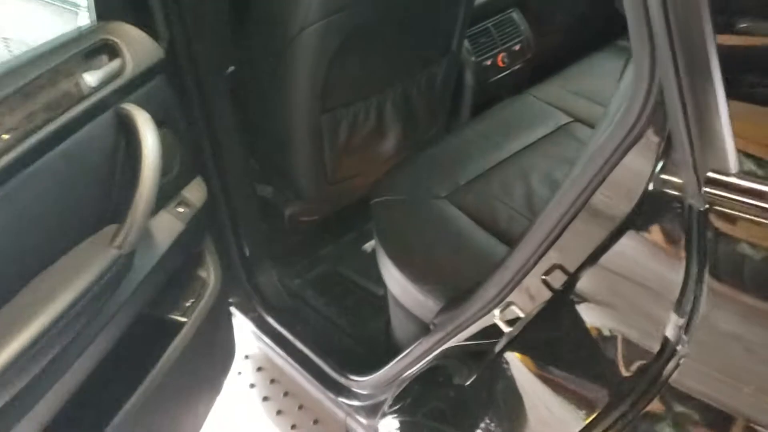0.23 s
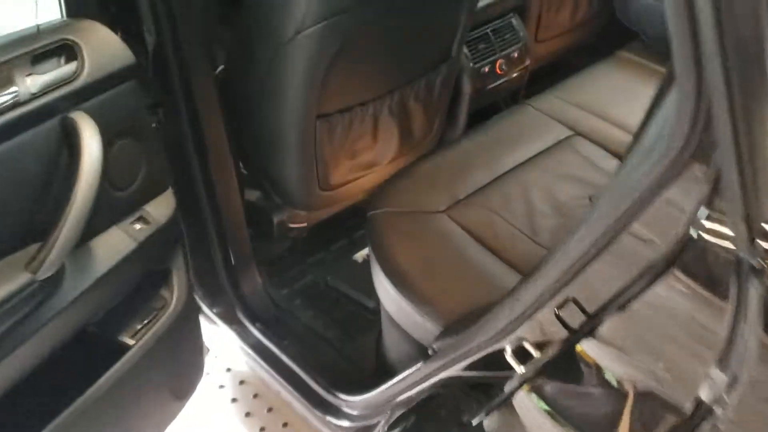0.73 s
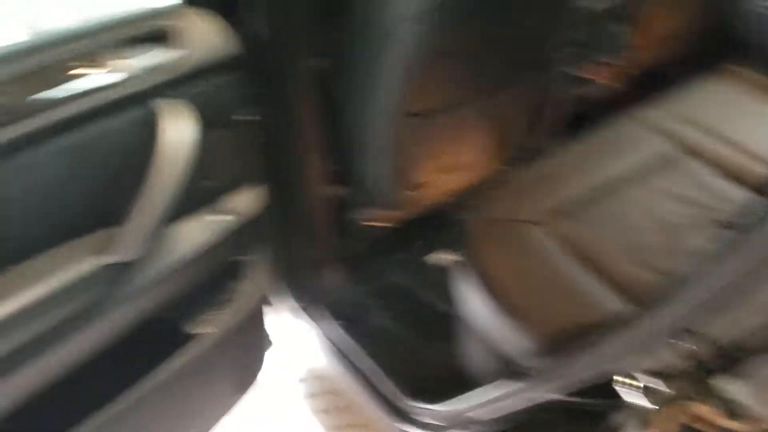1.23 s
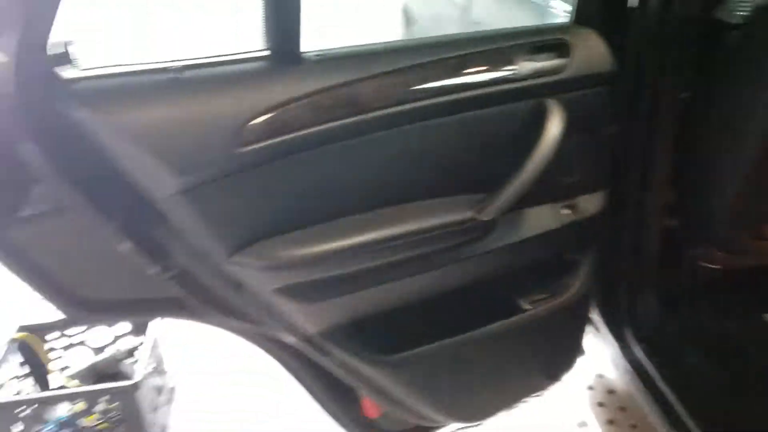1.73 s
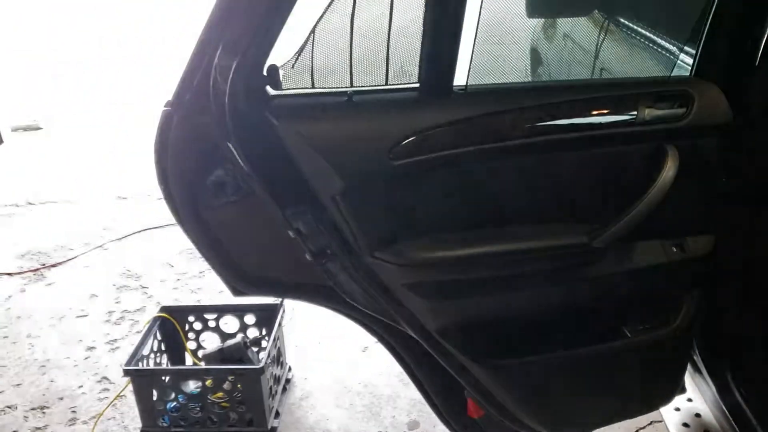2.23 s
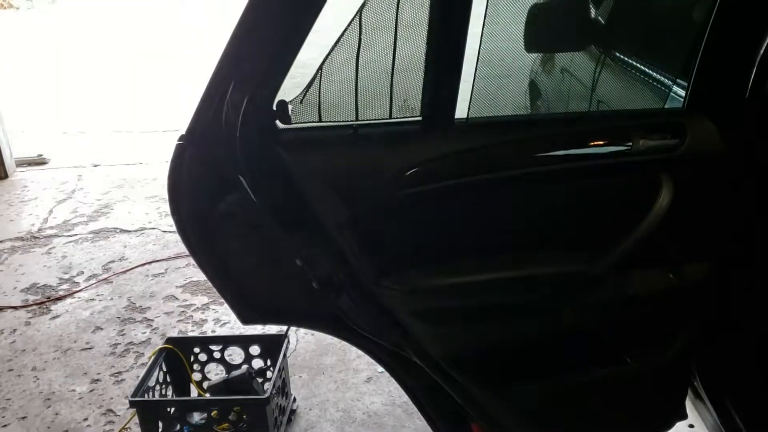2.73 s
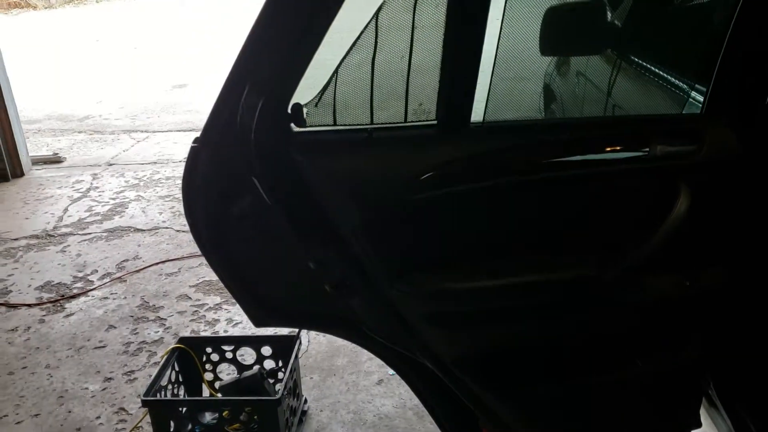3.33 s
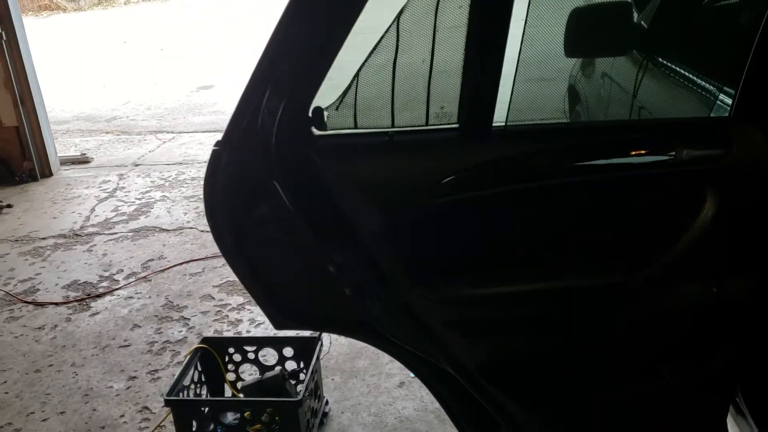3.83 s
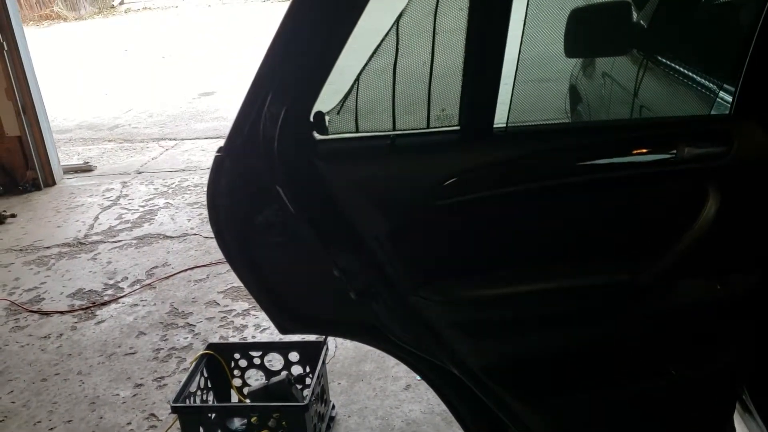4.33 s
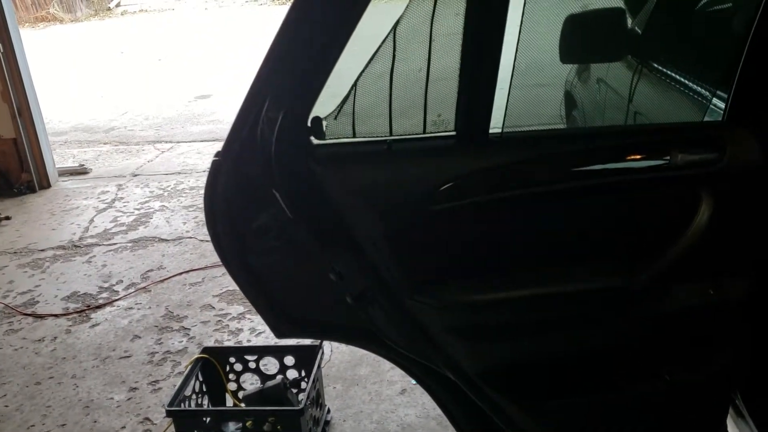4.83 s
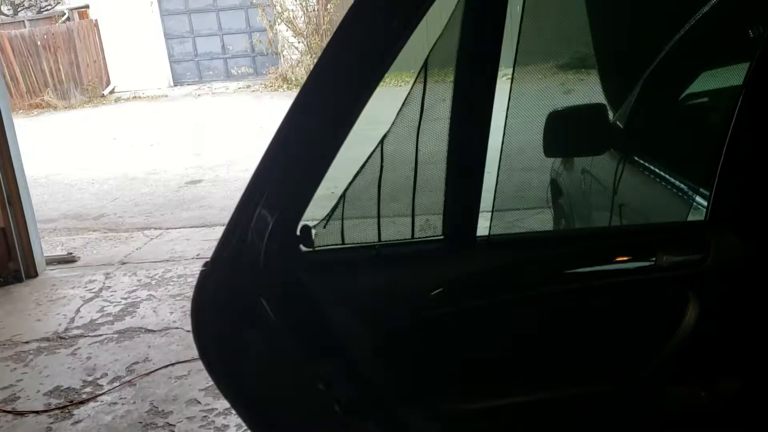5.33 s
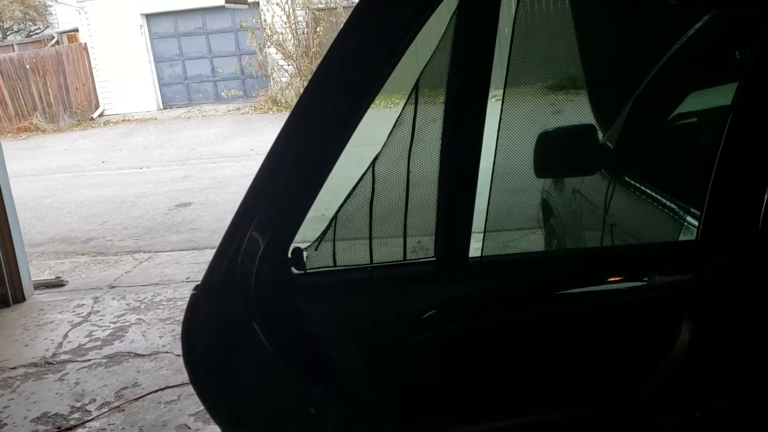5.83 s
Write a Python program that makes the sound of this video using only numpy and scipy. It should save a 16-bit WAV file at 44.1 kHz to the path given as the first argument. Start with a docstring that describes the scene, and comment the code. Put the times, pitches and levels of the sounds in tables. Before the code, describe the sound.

Close beside an open rear car door in a garage, a large engine idles unevenly with a misfire, booming about five lumpy chugs a second with soft gas puffs. A small metallic click and rattle, thin squeak and soft trim knock come at the start. Around two seconds a jacket swishes as the handheld microphone turns to the garage door, and the engine bay whirr opens up.

```python
"""A garage, beside the open rear door of a car whose V8 idles with a misfire.
Unequal firings kick the booms of exhaust and room, five chugs a second, each followed by a puff of gas noise.
Resonant noise makes the whirr of the engine bay, short struck modes its ticking; hiss and thin whines lie behind.
Decaying noise clicks and rattles at first, with a knock and a squeak; grainy noise is the swish of a jacket
as the person holding the microphone turns toward the open garage door."""
import sys
import numpy as np
from scipy import signal
from scipy.fft import rfft, irfft
from scipy.io import wavfile
from scipy.ndimage import uniform_filter1d

SR = 44100
rng = np.random.default_rng(int(sys.argv[2]) if len(sys.argv) > 2 else 0)


def log_audio(samples):
    """Write samples as a 16-bit WAV file to the path given in sys.argv[1]."""
    # one column per channel
    frames = np.atleast_2d(samples).T
    # limit to full scale, then quantise
    limited = np.clip(frames, -1, 1)
    pcm = np.round(limited * 32767).astype(np.int16)
    wavfile.write(sys.argv[1], SR, pcm)


N = 268304
TIME, FREQ = np.arange(N) / SR, np.fft.rfftfreq(N, 1 / SR)
TURNED = np.interp(TIME, [1.3, 2.1], [0, 1])  # 0 facing the cabin, 1 facing the garage door


def from_db(db):
    """Decibels to gain."""
    return 10 ** (np.asarray(db) / 20)


def spectrum(rows, axis=1):
    """One column of a table over frequency, joined on a log axis."""
    table = np.transpose(rows)
    return np.interp(np.log(FREQ + 1), np.log(table[0]), table[axis])


def curve(rows, axis=1):
    """One column of a table over time, joined by straight lines."""
    table = np.transpose(rows)
    return np.interp(TIME, table[0], table[axis])


def drift(rate_hz):
    """Random wander of unit size: noise with little left above the given rate."""
    wander = irfft(rfft(rng.standard_normal(N)) * np.exp(-(FREQ / rate_hz) ** 2), N)
    return wander / wander.std()


# likeness of left and right in diffuse sound: (frequency [Hz], correlation [0-1])
LEFT_RIGHT_LIKENESS = [(125, 0.9), (250, 0.86), (500, 0.74), (900, 0.17), (2000, 0)]


def noise(density_db):
    """Two-channel room noise of a given density [dB/Hz], alike mainly in the bass."""
    left, other = rfft(rng.standard_normal((2, N)))
    alike = np.clip(spectrum(LEFT_RIGHT_LIKENESS), 0, 1)
    right = alike * left + np.sqrt(1 - alike ** 2) * other
    return irfft(np.array([left, right]) * from_db(density_db), N) * np.sqrt(SR / 2)


def ripple(depth_db, spacing_hz):
    """Reflections comb a spectrum into fixed narrow peaks and dips, different at each port."""
    size = max(2, int(spacing_hz * N / SR))
    comb = rng.standard_normal((2, len(FREQ)))
    for _ in range(2):
        comb = uniform_filter1d(comb, size, axis=1)
    # full depth only above 1200 Hz
    return depth_db * comb / comb.std() * np.clip(FREQ / 1200, 0, 1)


def impulses(times, sizes):
    """A train of impulses that begins one second early, so that rings are already under way."""
    at = np.clip(np.round((np.asarray(times) + 1) * SR).astype(int), 0, N + SR)
    return np.bincount(at, sizes, N + SR + 1)[:-1]


def strike(times, sizes, modes):
    """Blows that ring a set of dying modes."""
    t = np.arange(SR // 3) / SR
    ring = 0
    for hz, db, t60 in modes:
        decay = np.exp(-np.log(1000) * t / t60)
        ring = ring + from_db(db) * decay * np.sin(2 * np.pi * hz * t)
    return signal.oaconvolve(impulses(times, sizes), ring)[SR:SR + N]


def garage(x, wet_db, t60):
    """Direct sound and a diffuse, exponentially dying tail for each port."""
    t = np.arange(SR // 2) / SR
    tail = rng.standard_normal((2, len(t))) * np.exp(-np.log(1000) * t / t60)
    tail /= np.linalg.norm(tail, axis=1, keepdims=True)
    return x + from_db(wet_db) * signal.oaconvolve(x[None], tail, axes=1)[:, :N]


# balance as the microphone turns, also played by the engine layers below:
# (time [s], gas gain [dB], engine bay gain [dB], hiss gain [dB], exhaust gain [dB])
FACING_GAINS = [(0, 3.5, -1.5, 1.5, -2.5), (.4, 2, -2, -2, -1.5), (1.1, 4.5, -3, -1.5, -4),
                (1.7, 2, 0.5, 0, -0.9), (3, 2.1, 0.24, 0.1, -0.5), (6.08, 0.4, 0.5, -0.4, 0.46)]
# high hiss before its gains: (frequency [Hz], density [dB/Hz])
HISS_SPECTRUM = [(1500, -115), (4500, -100), (7000, -97), (10000, -94.5), (16000, -100)]


def hiss(starts, dip_db=2.0, trough=0.85, crank_db=0.3, flicker_db=1.0):
    """A high hiss that sags once in every chug and throbs with each crank turn."""
    chug_position = np.interp(TIME, starts, np.arange(len(starts)))
    angle = 2 * np.pi * (chug_position - trough)
    sag_db = dip_db * (np.cos(angle / 2) ** 4 - 3 / 8)  # 3/8 is the mean of cos^4
    throb_db = crank_db * np.cos(2 * angle)
    air = noise(spectrum(HISS_SPECTRUM) + ripple(depth_db=2.0, spacing_hz=40))
    return air * from_db(curve(FACING_GAINS, axis=3) - sag_db - throb_db + flicker_db * drift(30))


# faint whines before their waver:
# (frequency [Hz], level facing the cabin [dB], level facing the door [dB], wander [Hz])
WHINE_LINES = [(482, -60, -70, 1.5), (890, -69, -69, 2), (2639, -78, -76, 4), (4000, -77, -76, .5),
               (6000, -82, -82, .5)]


def whines(waver_db=2):
    """Thin wandering sines from pump and electrics, changing as the microphone leaves the cabin."""
    total = 0
    for hz, cabin_db, door_db, wander in WHINE_LINES:
        level_db = cabin_db + TURNED * (door_db - cabin_db) + waver_db * drift(7.8)
        phase = 2 * np.pi * np.cumsum(hz + wander * drift(6.6)) / SR
        total = total + np.sqrt(2) * from_db(level_db) * np.sin(phase)  # root 2: levels are RMS
    return total


# click of a small metal part, then its rattles: (time [s], gain [dB], t60 [s])
CLICK_AND_RATTLES = [(0.08, 9, 0.021), (0.084, 0, 0.54), (0.102, -6.5, 0.32)]
# crowded ring of that part, before the gains above: (frequency [Hz], density [dB/Hz])
CLICK_RING = [(1500, -105), (2700, -83), (3200, -78.5), (4400, -84), (5600, -76.5), (6500, -100),
              (12000, -102)]
# soft knock on the trim: (time [s], level [dB])
TRIM_KNOCKS = [(.335, -40)]
# modes of the knocked trim: (frequency [Hz], gain [dB], t60 [s])
TRIM_RING = [(840, -2, 0.044), (990, -5, .04), (2300, -10, .03)]
# thin squeak, its pitch before a random wander: (time [s], frequency [Hz], level [dB])
SQUEAK_GLIDE = [(0, 13560, -53), (.07, 13550, -50), (.11, 13900, -75), (.15, 13000, -84)]


def handling():
    """Noise dying in steps makes a rattling click; struck modes knock and a gliding sine squeaks."""
    decay = 0
    for start_s, db, t60 in CLICK_AND_RATTLES:
        decay = decay + (TIME >= start_s) * from_db(db - 60 * abs(TIME - start_s) / t60)
    rattle = noise(spectrum(CLICK_RING) + ripple(depth_db=4.0, spacing_hz=80)) * decay
    knock_s, knock_db = np.transpose(TRIM_KNOCKS)
    knock = strike(knock_s, from_db(knock_db), TRIM_RING)
    squeak_hz = curve(SQUEAK_GLIDE) + 35 * drift(150)
    squeak = np.sin(2 * np.pi * np.cumsum(squeak_hz) / SR) * from_db(curve(SQUEAK_GLIDE, axis=2))
    squeak = squeak * (TIME < SQUEAK_GLIDE[-1][0])
    return rattle + garage(knock + squeak, wet_db=-2, t60=.25)


# strokes of the jacket: (time of peak [s], rise [s], fall [s], swish gain [dB], airy brushing gain [dB])
JACKET_STROKES = [(0.0, .05, 0.11, -8, -4), (1.06, 0.21, 0.18, -16, -12), (1.12, .38, .58, -22, -2),
                  (1.95, .19, 0.24, 0, -6), (2.19, 0.17, 0.095, -5, -20)]
# full swish of the cloth, before the stroke gains: (frequency [Hz], density [dB/Hz])
SWISH_SPECTRUM = [(150, -100), (500, -89), (1000, -70), (1300, -75), (1900, -75), (2600, -73),
                  (3400, -77.5), (4500, -74), (7000, -87), (10000, -89), (16000, -90)]
# airy hiss of a light touch, before the stroke gains: (frequency [Hz], density [dB/Hz])
AIRY_SPECTRUM = [(3000, -115), (9000, -100), (12200, -90.5), (13500, -93), (16000, -89)]


def jacket(grain_db=-0.4, catch_db=0.65, roundness=0.93):
    """Cloth slides over cloth in a fine grain, catching at folds; a light touch gives only an airy hiss."""
    swish, airy = 0, 0
    for peak_s, rise, fall, swish_db, airy_db in JACKET_STROKES:
        speed = np.interp(TIME, [peak_s - rise, peak_s, peak_s + fall], [0, 1, 0]) ** roundness
        # overlapping strokes add as powers
        swish = np.hypot(swish, speed * from_db(swish_db))
        airy = np.hypot(airy, speed * from_db(airy_db))
    grain = from_db(grain_db * drift(300) + catch_db * drift(46))
    cloth = noise(spectrum(SWISH_SPECTRUM) + ripple(depth_db=2.5, spacing_hz=70))
    return cloth * swish * grain + noise(spectrum(AIRY_SPECTRUM)) * airy


# whirr of fan and belts, before its gains: (frequency [Hz], density [dB/Hz])
WHIRR_SPECTRUM = [(100, -133), (350, -76.5), (620, -77.5), (860, -78.5), (1000, -81), (1300, -84.5),
                  (1700, -83), (2400, -85.5), (3300, -89.5), (5000, -92), (8000, -102), (16000, -112)]
# resonances of the bay, at full height once turned: (frequency [Hz], width [Hz], height above the whirr [dB])
BAY_RESONANCES = [(340, 21, 6), (560, 71, 2.5), (758, 66, 7.5), (841, 11, 9.5), (1700, 52, 2.5),
                  (2670, 740, 0.5)]
# engine cover and valve gear, before the tick level: (frequency [Hz], gain [dB], t60 [s])
VALVE_RING = [(1135, 13.5, 0.0077), (1750, 1, 0.0073), (2640, -0.5, 0.0057), (3550, -7, 0.0027),
              (5800, 0, .006)]


def engine_bay(times, flutter_db=0.71, tick_db=-60, tick_spread_db=2.0, shielded=0.44):
    """Fan and belts whirr in the bay's resonances; valves tick twice for every firing."""
    peaks_db = 0
    for hz, width, db in BAY_RESONANCES:
        peaks_db = peaks_db + db / (1 + (2 * (FREQ - hz) / width) ** 2)
    body_db = spectrum(WHIRR_SPECTRUM) + ripple(depth_db=2.0, spacing_hz=24.8)
    # the car body hides much of the resonances until the microphone leaves the cabin
    open_whirr = np.sqrt(TURNED) * noise(body_db + peaks_db)
    shielded_whirr = np.sqrt(1 - TURNED) * noise(body_db + shielded * peaks_db)
    whirr = (open_whirr + shielded_whirr) * from_db(flutter_db * drift(48))
    # one tick with each firing, one midway to the next
    closings = np.concatenate([times, (times[1:] + times[:-1]) / 2])
    closing_db = tick_db + tick_spread_db * rng.standard_normal(len(closings))
    ticks = strike(closings, from_db(closing_db), VALVE_RING)
    return (whirr + garage(ticks, wet_db=-3, t60=0.16)) * from_db(curve(FACING_GAINS, axis=2))


# exhaust gas, before the facing gain: (frequency [Hz], density [dB/Hz])
GAS_SPECTRUM = [(15, -85), (30, -76), (52, -60.5), (90, -65), (155, -63), (185, -71.5), (235, -69.5),
                (270, -73), (320, -68.5), (420, -83), (900, -94), (3000, -120)]


def gas(times, sizes, delay=.026, puff_s=0.015):
    """A puff of turbulent gas leaves the tailpipe after each firing, over a weak steady flow."""
    t = np.arange(SR // 5) / SR
    puff = t / puff_s * np.exp(-t / puff_s)
    puffs = signal.oaconvolve(impulses(times + delay, sizes ** 2), puff)[SR:SR + N]
    flow = np.sqrt(abs(puffs) + .015)  # the constant is the steady flow
    flow = flow / np.sqrt(np.mean(flow ** 2))
    return noise(spectrum(GAS_SPECTRUM)) * flow * from_db(curve(FACING_GAINS))


# the idle hunts around its set speed: (time [s], crank speed [turns/min])
IDLE_SPEED = [(0, 598.2), (.9, 599.4), (1.4, 574.8), (2.0, 599.2), (2.8, 609.1), (3.8, 592.2), (4.9, 618.2),
              (5.5, 601.3), (6.08, 624.5)]
# in two spells the engine limps, alternate chugs swinging late and early: (time [s], swing [ms])
LIMP_SWING = [(1.1, 0.6), (1.4, 5.5), (2.6, 0.2), (3.7, 5.5), (4.6, -0.5)]
FIRST_CHUG_S = -0.2234  # before the limp shifts it
ACCENT_DB_PER_MS = 0.29  # a late chug burns harder


def chugs():
    """Start and accent of every chug: one per two crank turns, alternately late and early in a limp."""
    t = np.arange(FIRST_CHUG_S, N / SR + .3, 1 / SR)
    turns_per_minute = np.interp(t, *np.transpose(IDLE_SPEED))
    cycles = np.cumsum(turns_per_minute) / (2 * 60 * SR)
    count = np.arange(int(cycles[-1]) + 1)
    even = np.interp(count, cycles, t)
    late_ms = np.interp(even, *np.transpose(LIMP_SWING)) * (-1.) ** count
    return even + late_ms / 1000, ACCENT_DB_PER_MS * late_ms


# cylinders in firing order, before chance: (strength without catching [0-1], lateness [ms])
CYLINDER_FIRINGS = [(0.89, -0.56), (0.15, -0.1), (0.49, 0.03), (0, -1), (0.36, -2.5), (0.01, 4), (0.15, 2),
                    (0.41, 0.32)]
CATCH, CATCH_SPREAD = 0.12, 0.07  # how far the weak cylinders catch, 0-1, and its change from chug to chug


def firings(starts, accent_db, scatter=0.048, jitter_ms=.2, uneven_db=0.5, lag_ms=0.9):
    """Eight firings a chug, each burning a little differently; the crank lags or hurries mid-cycle."""
    strength, late_ms = np.transpose(CYLINDER_FIRINGS)
    share = np.arange(len(strength)) / len(strength)
    start, length = starts[:-1, None], np.diff(starts)[:, None]
    # one draw a chug, then one draw a firing
    effort, catching, lag = rng.standard_normal((len(start), 3)).T[:, :, None]
    burn, slip = rng.standard_normal((2, len(start), len(strength)))
    late = late_ms + lag_ms * lag * np.sin(np.pi * share) + jitter_ms * slip
    times = start + length * share + late / 1000
    facing_db = np.interp(start, TIME, curve(FACING_GAINS, axis=4))
    effort_db = facing_db + accent_db[:-1, None] + uneven_db * effort
    catch = np.clip(CATCH + CATCH_SPREAD * catching, 0, 1)
    burnt = strength + catch * (1 - strength) + scatter * burn
    sizes = from_db(effort_db) * burnt
    return times.ravel(), np.maximum(sizes, 0).ravel()


# booms of exhaust and garage, before the overall level: (frequency [Hz], width [Hz], gain [dB])
BOOM_RESONANCES = [(38.76, 4.6, 9.5), (65.5, 7.45, 17.5), (74.34, 4.1, 19.5), (98.7, 4.9, 7.5),
                   (123.43, 7.12, 21.5), (119.85, 15.3, 18)]
# side of each standing wave on which the microphone stands, one per boom: sign [+1 or -1]
BOOM_SIDES = [1, 1, -1, 1, 1, -1]


def exhaust(times, sizes, level_db=20.0):
    """Each firing kicks the low resonances, which beat against each other."""
    kicks = impulses(times, sizes)
    booms = 0
    for (hz, width, db), side in zip(BOOM_RESONANCES, BOOM_SIDES):
        resonance = signal.iirpeak(hz, hz / width, SR)
        booms = booms + side * from_db(db) * signal.lfilter(*resonance, kicks)
    # the muffler swallows the sharp edge of each kick
    muffler = signal.butter(2, 400, fs=SR, output="sos")
    return from_db(level_db) * signal.sosfilt(muffler, booms)[SR:]


def scene():
    """The idling engine and the small sounds beside it."""
    starts, accent_db = chugs()
    times, sizes = firings(starts, accent_db)
    background = hiss(starts) + whines()
    nearby = handling() + jacket()
    engine = engine_bay(times) + gas(times, sizes) + exhaust(times, sizes)
    return background + nearby + engine


# colour of the two microphone ports: (frequency [Hz], left gain [dB], right gain [dB])
PORT_COLOUR = [(30, 4, 1.9), (305, -2, -5.5), (3050, 1, -1.5), (5140, -2, -3), (6840, 4, 0.5),
               (7040, 9.5, -4), (7650, 9.5, -6), (8300, -7.5, 6.5), (8540, -2, 2.5), (10600, -2, 0),
               (11840, 5, 3.5), (13000, -3, 4.5), (15600, 6, -14)]
EDGE_HZ = 15800  # upper band limit


def record(dry):
    """Each port colours the sound in its own way; then a steep low-pass limits the band."""
    colour = from_db([spectrum(PORT_COLOUR, axis=1), spectrum(PORT_COLOUR, axis=2)])
    heard = irfft(rfft(dry) * colour, N)
    low_pass = signal.firwin(511, EDGE_HZ, window=("kaiser", 9), fs=SR)
    return signal.oaconvolve(heard, low_pass[None], "same")


dry = scene()
out = record(dry)
log_audio(out)
```